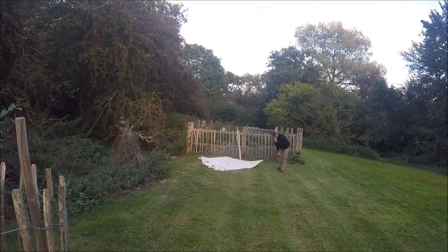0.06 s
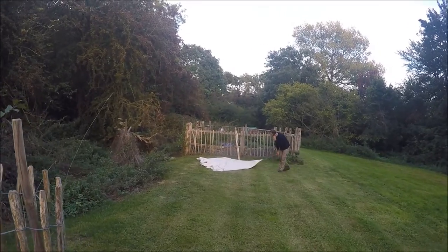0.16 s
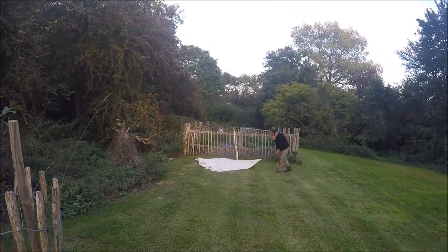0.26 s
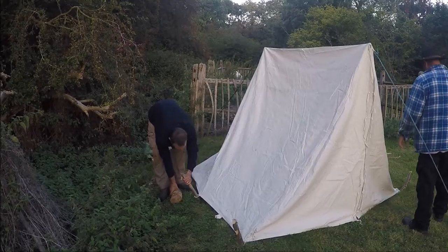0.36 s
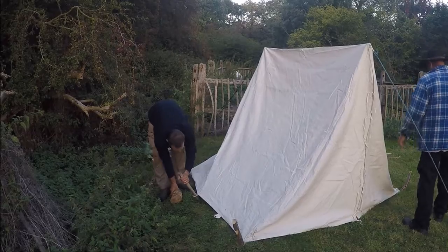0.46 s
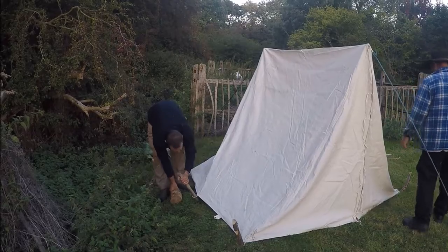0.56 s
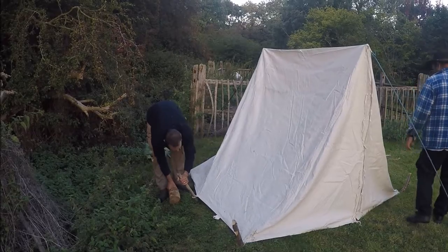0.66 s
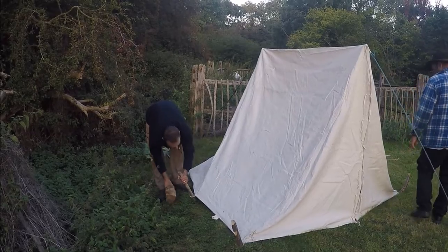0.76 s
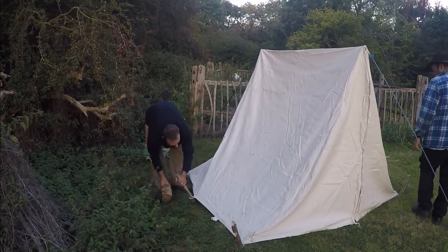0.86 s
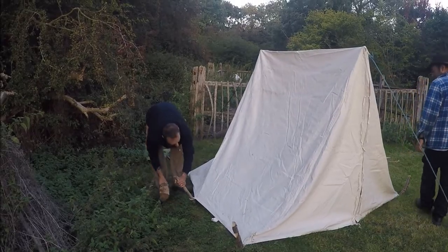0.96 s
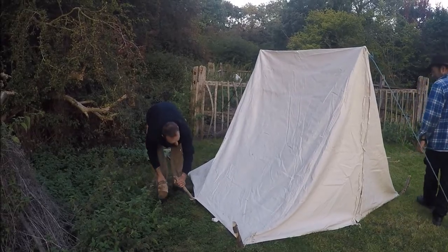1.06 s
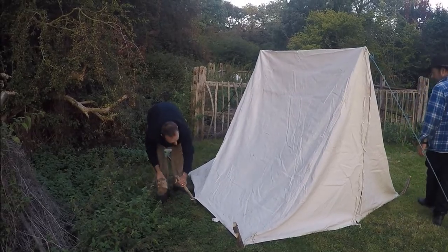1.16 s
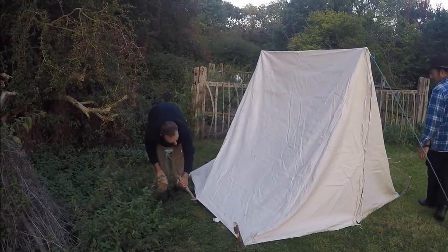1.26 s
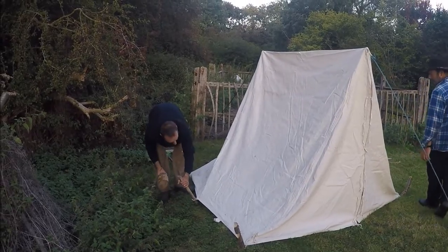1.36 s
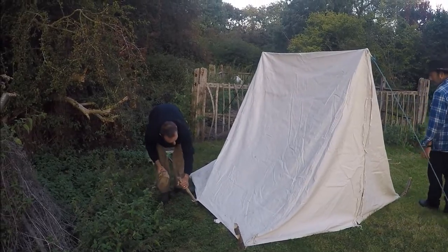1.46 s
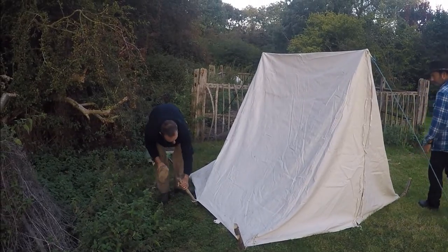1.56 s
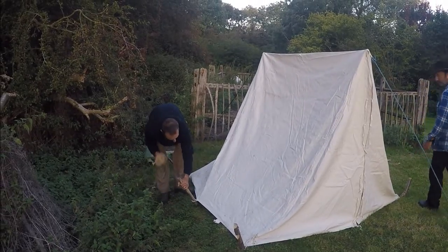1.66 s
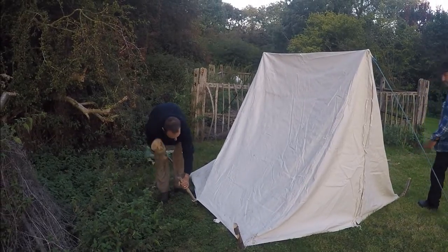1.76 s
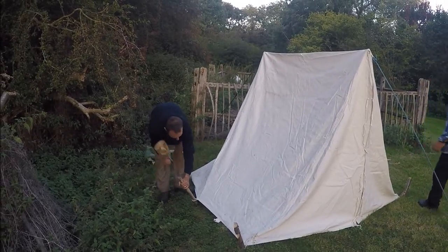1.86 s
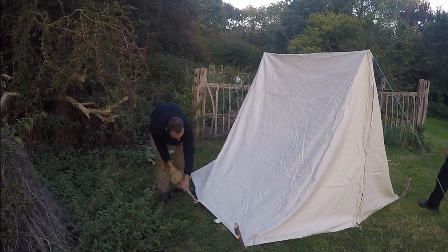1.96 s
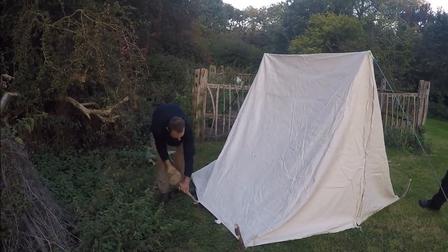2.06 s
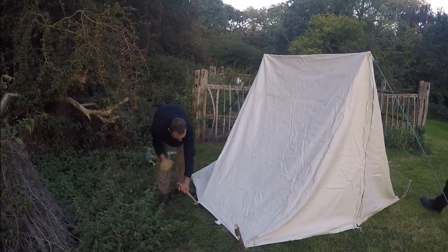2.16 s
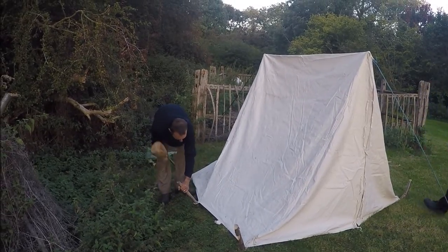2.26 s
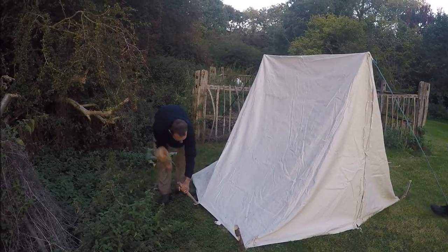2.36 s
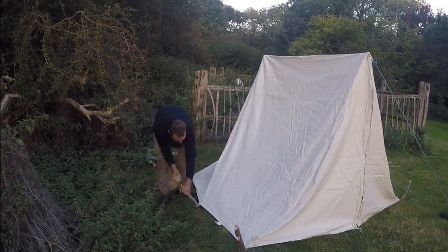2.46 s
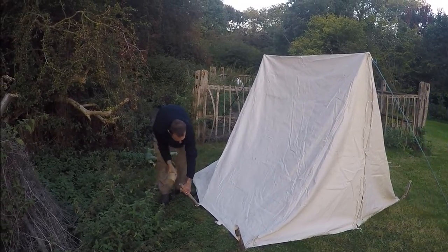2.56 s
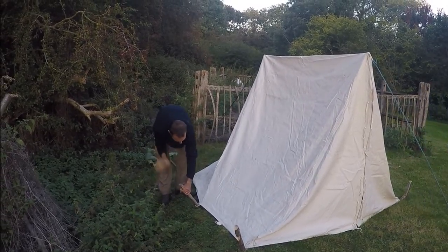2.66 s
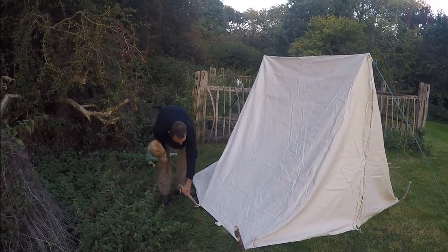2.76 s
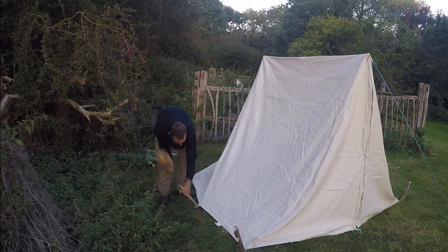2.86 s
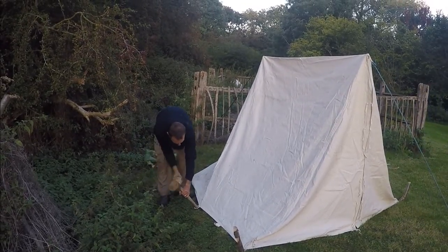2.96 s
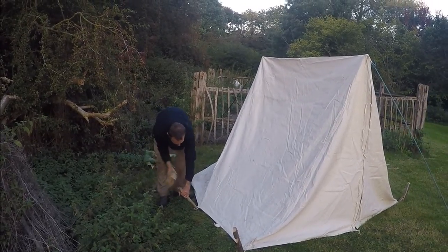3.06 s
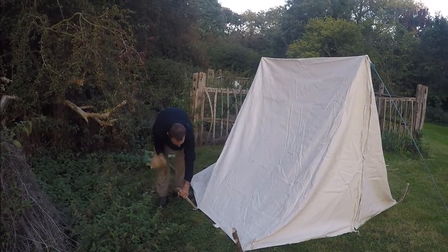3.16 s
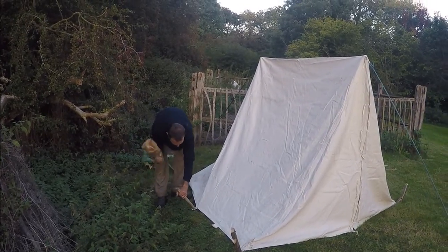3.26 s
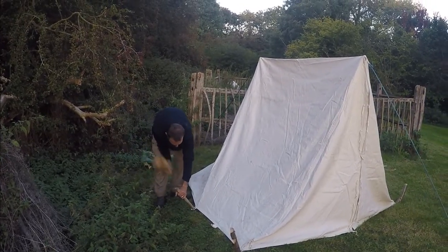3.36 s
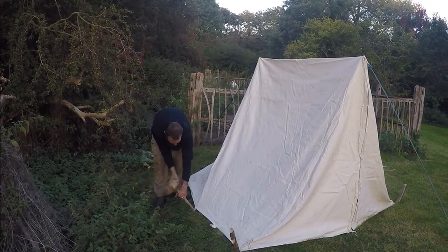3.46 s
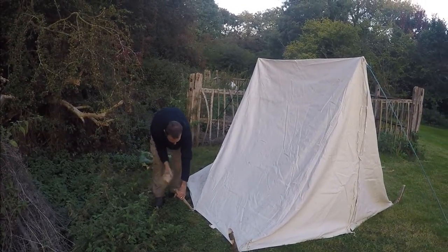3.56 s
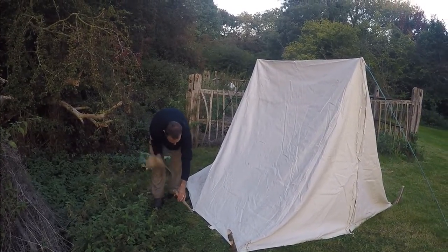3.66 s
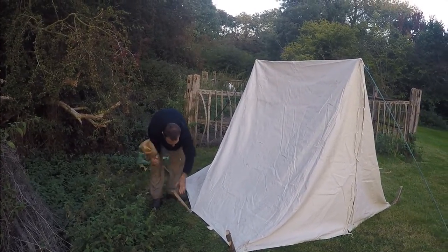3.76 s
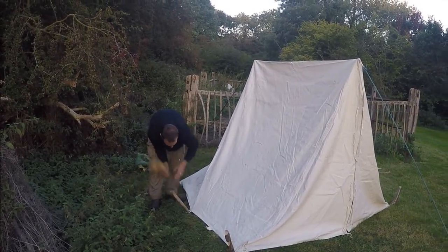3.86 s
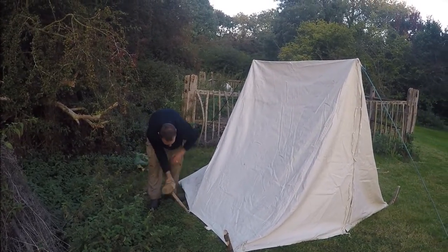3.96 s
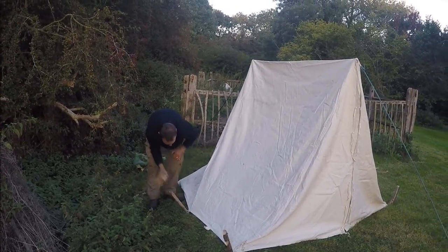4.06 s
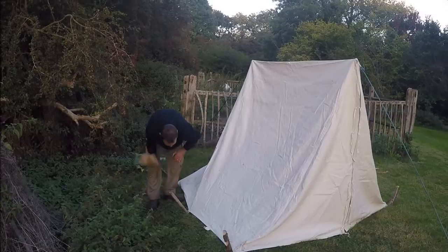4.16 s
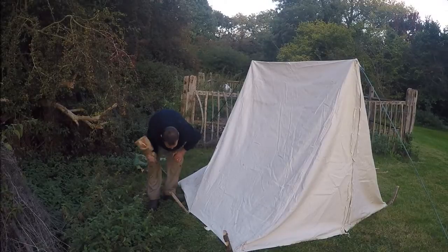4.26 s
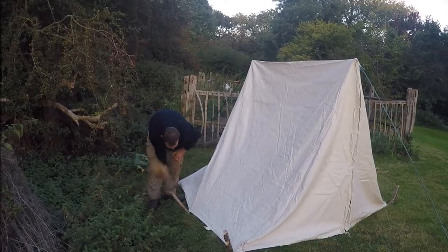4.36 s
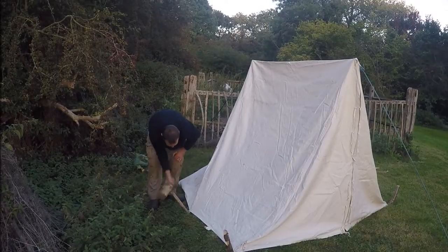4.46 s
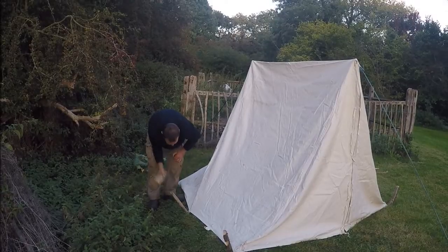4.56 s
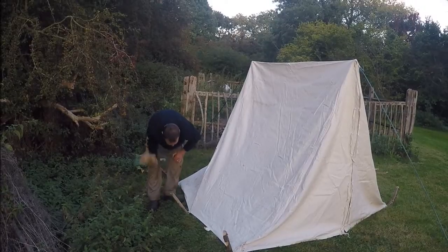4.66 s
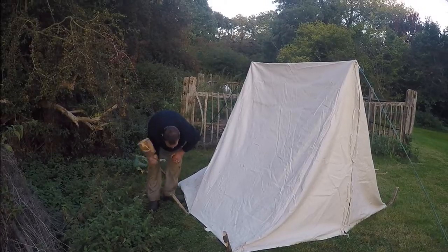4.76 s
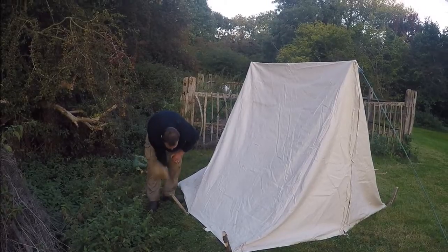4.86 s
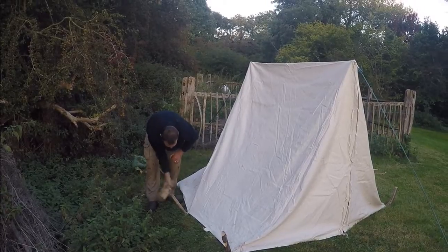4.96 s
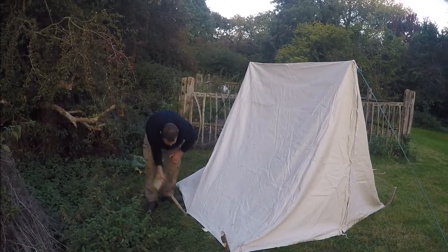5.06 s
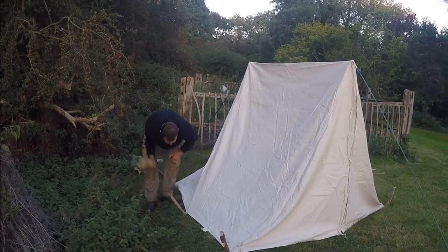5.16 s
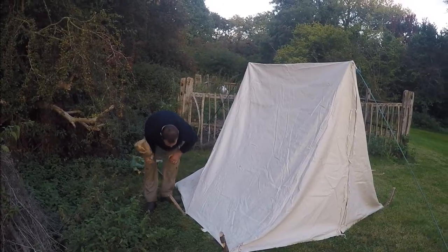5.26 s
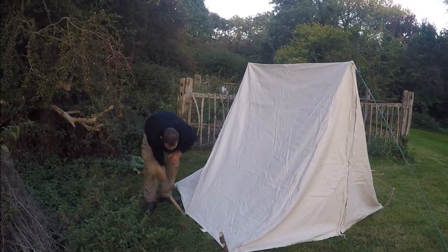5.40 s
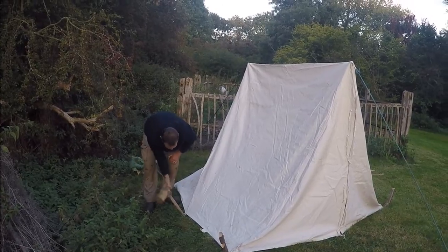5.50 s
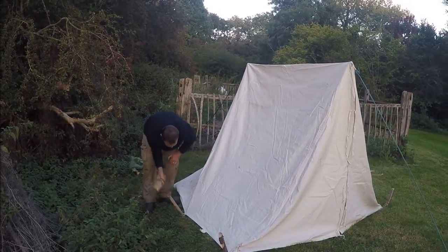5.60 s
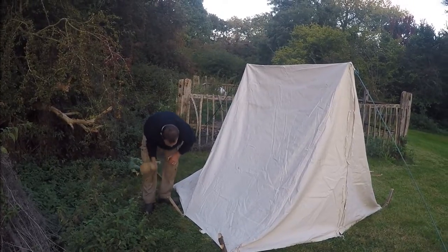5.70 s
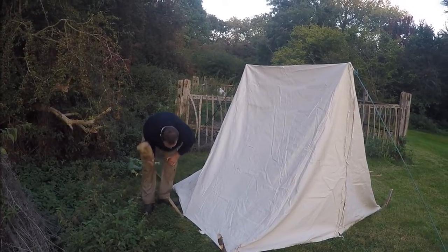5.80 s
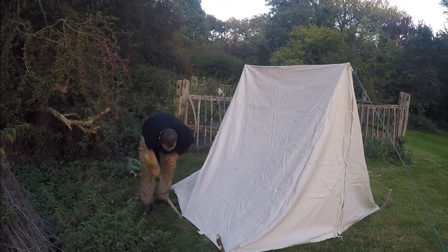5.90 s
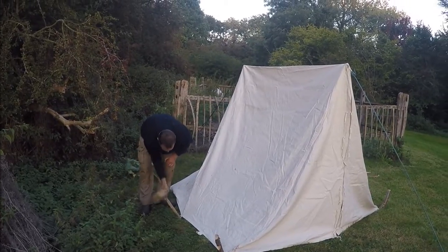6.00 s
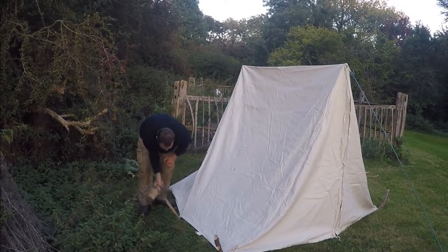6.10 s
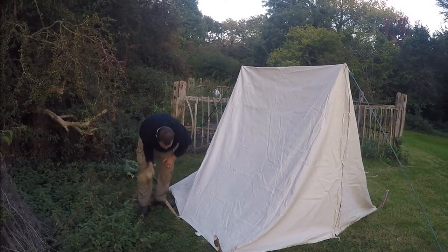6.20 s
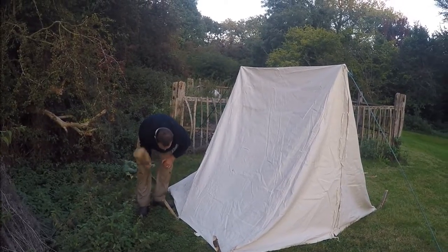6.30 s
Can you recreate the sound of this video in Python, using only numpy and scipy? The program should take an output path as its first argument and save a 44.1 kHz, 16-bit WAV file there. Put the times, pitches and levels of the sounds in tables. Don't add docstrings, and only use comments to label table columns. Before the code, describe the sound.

Very faint distant road noise fades into a short silence, then a nearer outdoor background cuts in with low traffic rumble and slight cloth rustle. A wooden mallet strikes a wooden peg about twice a second, light at first and then hard, each dry knock with a small turf thud. A lighter stick knocks twice and a bird hoots twice. The microphone is fairly close, with a faint high whine.

```python
import sys
import numpy as np
from scipy import signal
from scipy.fft import rfft, irfft
from scipy.io import wavfile
from scipy.ndimage import uniform_filter1d

SR = 44100
rng = np.random.default_rng(int(sys.argv[2]) if len(sys.argv) > 2 else 0)


def dump_mix(stems):
    frames = np.atleast_2d(stems).T
    limited = np.clip(frames, -1, 1)
    pcm = np.round(limited * 32767).astype(np.int16)
    wavfile.write(sys.argv[1], SR, pcm)


def invert_db(x):
    u = np.asarray(x, float) / 20
    return 10 ** u


N = 279390


def evened(x):
    return x / np.sqrt(np.mean(x ** 2) + 1e-30)


def add(mix, s, sound):
    part = mix[round(s * SR):][:len(sound)]
    part += sound[:len(part)]


def spectrum_gain(points, size):
    hz, db = np.transpose(points)
    bins_hz = np.fft.rfftfreq(size, 1 / SR)
    return invert_db(np.interp(np.log(bins_hz + 1), np.log(hz + 1), db))


def ring(hz, ms, db, turn=0., soft=0.83):
    t = np.arange(4096) / SR
    u = t / (ms / 1000)
    envelope = (u * np.exp(1 - u)) ** soft
    return invert_db(db) * envelope * np.sin(2 * np.pi * (hz * t + turn))


def scatter(x, start_ms, swell_ms, t60, dull_hz):
    taps = np.zeros(SR)
    slots = np.arange(0, SR - 22, 22)
    at = slots + rng.integers(0, 22, len(slots))
    taps[at] = rng.choice([-1., 1.], len(at)) * rng.rayleigh(1, len(at))
    t = np.maximum(np.arange(SR) / SR - start_ms / 1000, 0)
    taps *= (1 - np.exp(-t * 1000 / swell_ms)) * invert_db(-60 * t / t60)
    taps = signal.lfilter(*signal.butter(1, dull_hz, fs=SR), taps)
    return signal.fftconvolve(x, taps / np.linalg.norm(taps))[:N]


# frequency in Hz, level in dB per Hz.
RUMBLE = [(12, -42), (22, -6), (35, -5), (50, 2.5), (62, -4.5), (69, 7), (76, -9.5), (88, -14),
          (120, -16.5), (160, -20), (250, -22), (330, -24.5), (400, -23.5)]
# frequency in Hz, level in dB per Hz.
ROAR = [(260, -40), (450, -10.5), (499, -9.5), (632, -7.5), (777, -2), (874, 0.0), (1110, -3.0),
        (2150, -22.5), (2970, -20.5), (3500, -28), (4430, -29.5), (7650, -43.5), (8480, -42.5),
        (15300, -47.5)][1:]
# centre in Hz, level in dB at the near place, level in dB at the
LAYERS = [
    (60.3, -50, -70, 0.76),
    (900, -51.5, -73, 0.95),
    (3420, -67, -84.5, 1.15),
    (10000, -75.5, -99, 0.103),
]
# time in seconds, level in dB.
TRAFFIC = [(.55, 0.5), (1.05, -1), (2.0, -0.7), (2.9, -0.3), (3.3, 0.3), (3.9, 0.5), (4.4, 3), (5.0, 2),
           (5.6, 3.5), (6.3, 1.9)]
# start in seconds, end in seconds.
GAP = (.339, .4978)


def field():
    frames = N // 256 + 5
    a, b, patches = rng.standard_normal((frames, 513, 3)).T
    patches = uniform_filter1d(patches, size=10, axis=0)
    patches = evened(uniform_filter1d(patches, size=12, axis=1))
    noise = signal.istft((a + 1j * b) * invert_db(1.09 * patches), nperseg=1024, noverlap=768)[1][:N]
    roar_db = -14
    colour = RUMBLE + [(hz, db + roar_db) for hz, db in ROAR]
    coloured = rfft(noise) * spectrum_gain(colour, N)
    place = np.log(np.fft.rfftfreq(N, 1 / SR) + 1)
    centre_hz, near_db, far_db, follow = np.transpose(LAYERS)
    t = np.arange(N) / SR
    traffic_db = np.interp(t, *np.transpose(TRAFFIC))
    fade_db = -16.5 * (t / GAP[0]) ** 2.6
    out = np.zeros(N)
    for k, share in enumerate(np.eye(len(LAYERS))):
        layer = irfft(coloured * np.interp(place, np.log(centre_hz), share), N)
        level_db = np.where(t < GAP[0], far_db[k] + fade_db, near_db[k] + follow[k] * traffic_db)
        out += invert_db(level_db) * evened(layer)
    return out


# pitch in Hz, width in Hz, level in dB.
WHINE = (8651, 10, -91)


def whine():
    hz, width, db = WHINE
    t = np.arange(N) / SR
    drift = np.cumsum(rng.standard_normal(N)) * np.sqrt(2 * np.pi * width / SR)
    return invert_db(db + 6.0) * np.sin(2 * np.pi * hz * t + drift) * (t > GAP[1])


# middle in seconds, half length in seconds, pitch in Hz, level in dB.
RUSTLES = [(0.727, .25, 4600, -73.5), (0.716, .25, 10600, -82.5), (2, 0.2, 5000, -77),
           (1.854, 0.29, 3240, -70.5), (4.1, 0.08, 1960, -62), (4.5, .15, 10500, -82)]


def rustles():
    out = np.zeros(N)
    for s, half, hz, db in RUSTLES:
        size = round(2 * half * SR)
        grain = evened(uniform_filter1d(rng.standard_normal(SR), size=300))[:size]
        grit = rng.standard_normal(SR)[:size] * invert_db(1.7 * grain)
        band = signal.lfilter(*signal.butter(2, [hz * 0.82, hz * 1.1], "band", fs=SR), grit)
        add(out, s - half, invert_db(db) * evened(band) * signal.windows.tukey(size, .5))
    return out


# start in seconds, length in seconds, note in Hz, level in dB.
HOOTS = [
    (4.423, .082, 792, -28),
    (5.488, 0.08, 759, -30),
]


def bird():
    scoop, scoop_s = 0.362, 0.02166
    climb = 0.0476
    swell_db, swell_s, creep_db = -22, 0.035, 5
    linger_db, linger_db_per_s, stop_s, linger_s = -9.5, -44, 0.0071, 0.86
    flutter_db, flutter_s = 1.5, .02
    out = np.zeros(N)
    for s, length, note_hz, db in HOOTS:
        t = np.arange(0, length + linger_s, 1 / SR)
        to_end = np.minimum(t / length - 1, 0)
        after = np.maximum(t - length, 0)
        pitch_hz = note_hz * (1 - scoop * np.exp(-(t / scoop_s) ** 1.41) + climb * to_end)
        turn = 2 * np.pi * np.cumsum(pitch_hz) / SR
        level_db = db + swell_db * np.maximum(1 - t / swell_s, 0) + creep_db * to_end
        flutter = uniform_filter1d(rng.standard_normal(SR), round(flutter_s * SR))
        flutter = evened(uniform_filter1d(flutter, round(flutter_s * SR)))[:len(t)]
        level_db += (linger_db + flutter_db * flutter) * np.minimum(after / stop_s, 1)
        level_db += linger_db_per_s * after
        tone = np.sin(turn) + invert_db(-34) * np.sin(2 * turn) + invert_db(-39) * np.sin(3 * turn)
        add(out, s, invert_db(level_db + 3) * tone * signal.windows.tukey(len(t), .02))
    return out


# start in seconds, level in dB, bright share in dB.
KNOCKS = [
    (2.0128, -31.5, -39),
    (4.3354, -23.5, 1),
]
# pitch in Hz, ring in ms, level in dB, share of the brightness it follows.
STICK = [(560, 2.8, -12.5, 0), (990, 1.75, -4.5, 0), (1380, 1.22, 1.5, 0.007), (1980, 0.52, -5.5, 0.12),
         (3200, 0.48, 2, 0.19), (3840, 0.95, -4, 0.32), (4980, 0.29, -1, 0.66), (4065, 1.83, -8.5, 0.31),
         (5970, 0.93, -18, 0.95), (9300, .5, -31, 1), (11800, .4, -42, 1)]
# start in seconds, level in dB, pitch in Hz.
TWIGS = [
    (.663, -58, 3690),
    (.844, -65, 5170),
    (1.636, -52.5, 3000),
]


def small_wood():
    out = np.zeros(N)
    for s, db, bright_db in KNOCKS:
        for k, (hz, ms, mode_db, bright) in enumerate(STICK):
            sign = (-1) ** k
            add(out, s, sign * ring(hz, ms, db + mode_db + bright * bright_db, soft=0.98))
    for s, db, hz in TWIGS:
        add(out, s, ring(hz, 1.1, db) + ring(hz * .85, .9, db - 3))
        add(out, s, ring(hz * 1.4, .7, db - 6) + ring(hz * 1.8, .7, db - 6))
    return out


# pitch in Hz, ring in ms, level in dB against the crack, how far
GRAIN = [(2454, 0.73, 6, 0.81, .01), (3168, 1.27, 3, .01, .01), (3950, 0.69, 2.6, .01, .01),
         (5660, 0.44, -4, .01, 1)]
# frequency in Hz, level in dB.
CRACK = [(1000, 17), (2000, 12.5), (4000, -1), (6800, 0.5), (7600, -8.5), (8500, -5.5), (11000, -7),
         (12500, -18), (14800, -11.5), (17000, -11)]


def blow(db, head_hz, peg_hz, peg_db, head_ms, grain_hz, grain_db, splinter_db, luck):
    sound = ring(head_hz, head_ms, db, soft=2.33)
    sound += ring(head_hz * .84, 3, db - 18)
    sound -= ring(head_hz * 1.385, 3.1, db + 3.7 * peg_db)
    sound += ring(1290.0, 0.6, db + .5 * peg_db - 3.5, soft=1.32)
    sound += ring(peg_hz, 1.3, db + peg_db)
    sound += ring(peg_hz * .78, 4.9, db + peg_db - 23.5)
    for (_, ms, mode_db, _, _), hz, own_db, turn in zip(GRAIN, grain_hz, grain_db, luck):
        sound += ring(hz, ms, own_db + mode_db, turn)
    size = len(sound)
    t = np.arange(size) / SR
    noise = evened(irfft(rfft(rng.standard_normal(size)) * spectrum_gain(CRACK, size)))
    noise *= invert_db(splinter_db) * signal.windows.tukey(2 * size, .3)[size:]
    splinters = invert_db(6.5) * t / 0.00075 * np.exp(1 - t / 0.0011)
    ragged = invert_db(2.5 * evened(uniform_filter1d(rng.standard_normal(size), size=90)))
    canvas = invert_db(-12.5) * (t / 0.01 * np.exp(1 - t / 0.0097)) ** 0.67 * ragged
    return sound + (splinters + canvas) * noise


# time in seconds, level in dB, mallet head pitch in Hz, peg pitch in Hz.
BLOWS = [
    (2.158, -22.5, 900, 1380),
    (2.631, -24, 770, 1820),
    (3.12, -16, 780, 2060),
    (3.614, -16, 802, 1506),
    (4.1104, -11, 812, 1660),
    (4.623, -9, 838, 1690),
    (5.123, -8.5, 823, 1677),
    (5.648, -7, 847, 1606),
    (6.183, -8.5, 830, 1610),
]
# crack in dB against the blow, off-centre in dB, turf share in dB.
LANDINGS = [(-24.5, -5, -18), (-15.5, 6.5, -11), (-17.5, 4, -23), (-25, 9.5, -16.5), (-26.5, -2, -21.5),
            (-22.5, -0.5, -26), (-26, -20, -20.5), (-27.5, -5, -24), (-27.5, 0, -21.5)]
# pitch in Hz, ring in ms, level in dB, delay in ms, share of the turf level followed.
TURF = [
    (303, 1.53, 0, 0.72, 0.7),
    (97.8, 6.2, -15, 0.93, 0.26),
    (72.4, 7.8, -22, 2.94, 0.25),
]
# start in seconds, level in dB, pitch in Hz.
REBOUNDS = [(2.168, -54, 1400), (2.175, -49, 1580), (2.644, -36, 1420), (2.647, -35, 1130),
            (3.135, -32, 1250), (3.631, -35.5, 1520), (4.127, -36.5, 1630), (5.14, -46, 1560),
            (5.666, -42, 1210), (5.689, -31, 760), (5.696, -37, 340), (5.698, -45, 1300), (6.2, -52, 1200)]


def mallet():
    usual_crack_db, usual_blow_db = -24, -8.5
    head_ms, head_ms_per_crack, head_ms_per_blow = 2.11, -0.017, 0.026
    peg_db, peg_per_crack, peg_db_per_s, half_way_s = -11.5, 0.38, -0.5, 4.2
    grain_wander, grain_scatter_db = .025, 1.5
    wood, turf = np.zeros(N), np.zeros(N)
    grain_hz, _, _, by_off, by_sharp = np.transpose(GRAIN)
    lucks = rng.random((len(BLOWS), 3, 4))
    for (s, db, head_hz, peg_hz), (crack_db, off_db, turf_db), luck in zip(BLOWS, LANDINGS, lucks):
        sharp_db = crack_db - usual_crack_db
        spot = 2 * luck - 1
        own_ms = head_ms + head_ms_per_crack * sharp_db + head_ms_per_blow * (db - usual_blow_db)
        own_peg_db = peg_db + peg_per_crack * sharp_db + peg_db_per_s * (s - half_way_s)
        own_grain_hz = grain_hz * (1 + grain_wander * spot[1])
        grain_db = db + crack_db + by_off * off_db + by_sharp * sharp_db + grain_scatter_db * spot[2]
        sound = blow(db, head_hz, peg_hz, own_peg_db, own_ms, own_grain_hz, grain_db, db + crack_db, luck[0])
        add(wood, s - .0008, sound)
        for hz, ms, thud_db, delay_ms, follow in TURF:
            add(turf, s + delay_ms / 1000, ring(hz, ms, db + follow * turf_db + thud_db))
    for s, db, hz in REBOUNDS:
        puff = rng.standard_normal(200) * np.hanning(200) * invert_db(db - 27)
        add(wood, s, ring(hz, 1.4, db) + ring(hz * 2.3, .7, db - 17))
        add(wood, s, puff)
    return wood, turf


def scene():
    wood, turf = mallet()
    stick, hoot = small_wood(), bird()
    near = wood + invert_db(-12) * stick
    close = invert_db(-25.0) * scatter(near, start_ms=17.8, swell_ms=12.0, t60=0.16, dull_hz=6100)
    hedge = invert_db(-40.5) * scatter(near, start_ms=110.0, swell_ms=59.0, t60=0.68, dull_hz=2500)
    trees = invert_db(-17) * scatter(hoot, start_ms=25., swell_ms=20., t60=.9, dull_hz=3000)
    mix = field() + rustles() + hoot + trees + stick + wood + turf + close + hedge
    return mix[None]


def top_cut(x):
    return signal.sosfilt(signal.butter(12, 16470, fs=SR, output="sos"), x)


def record(dry):
    edge_hz = 15350
    t = np.arange(N) / SR
    gate = np.clip((GAP[0] - t) / .002, 0, 1) + np.clip((t - GAP[1]) / 0.0015, 0, 1)
    edge = signal.firwin2(401, [0, edge_hz - 100, edge_hz + 100, SR / 2], [1, 1, .03, .01], fs=SR)
    mix = signal.oaconvolve(dry + whine(), edge[None], "same") * gate
    return top_cut(mix)


dry = scene()
out = record(dry)
dump_mix(out)
```